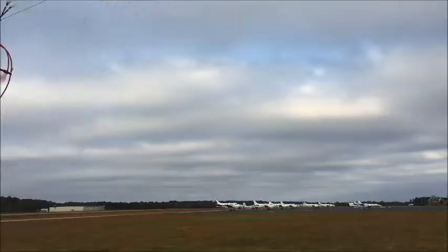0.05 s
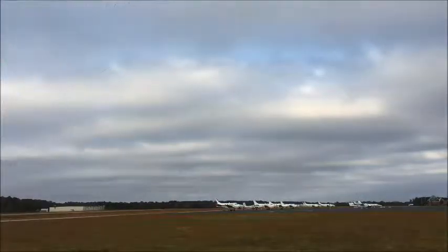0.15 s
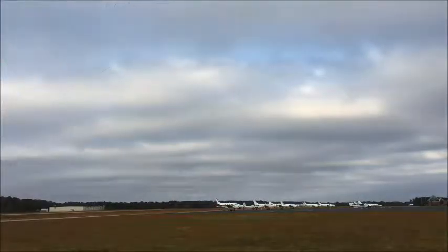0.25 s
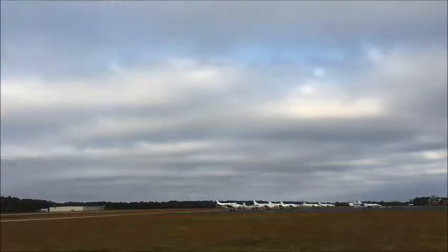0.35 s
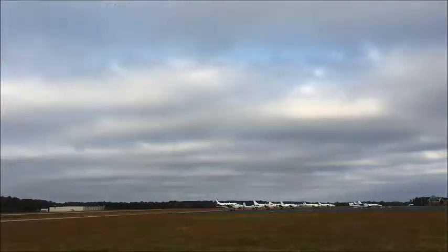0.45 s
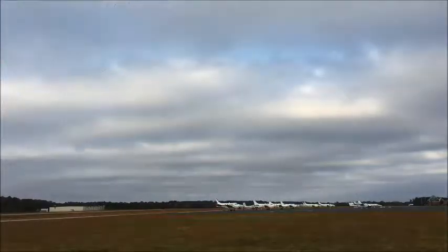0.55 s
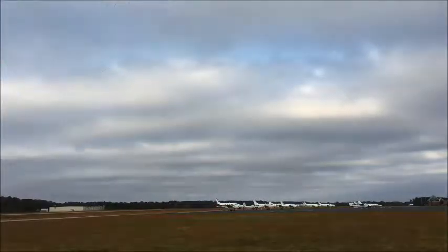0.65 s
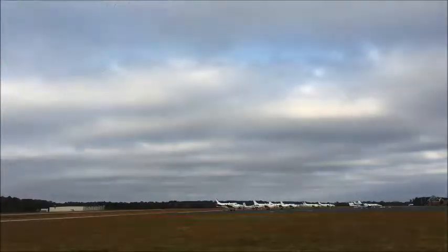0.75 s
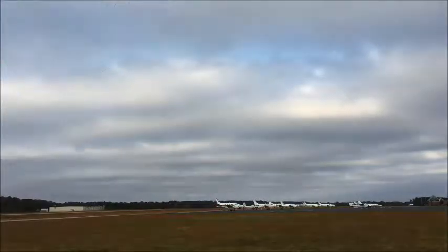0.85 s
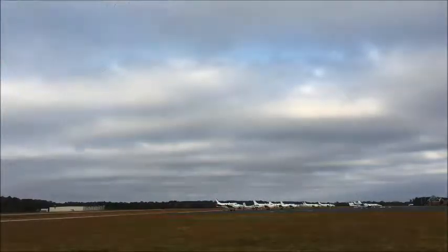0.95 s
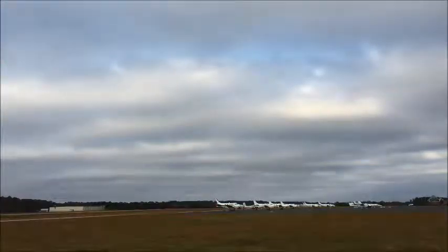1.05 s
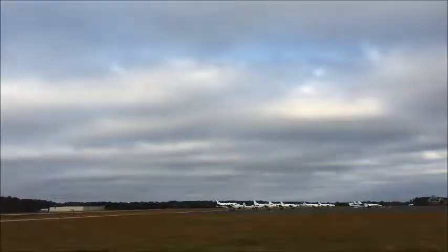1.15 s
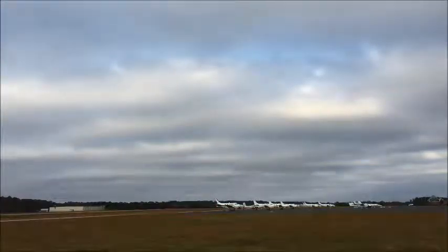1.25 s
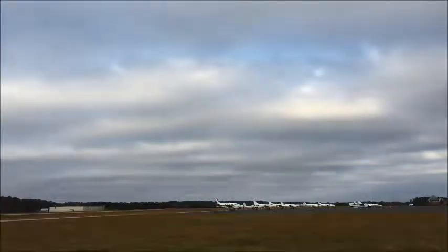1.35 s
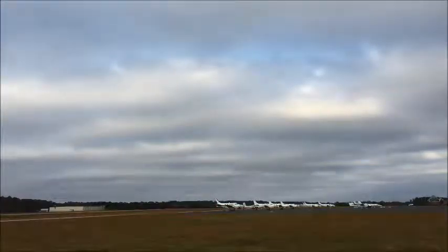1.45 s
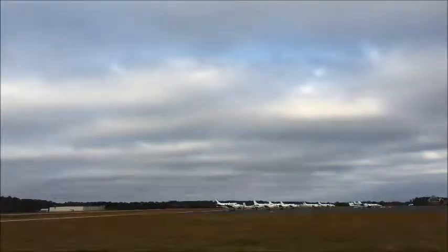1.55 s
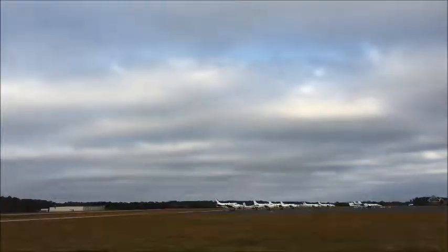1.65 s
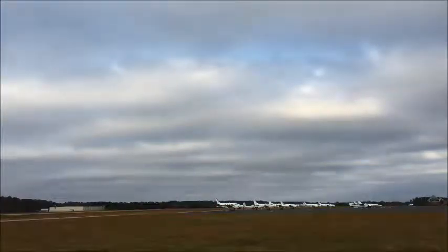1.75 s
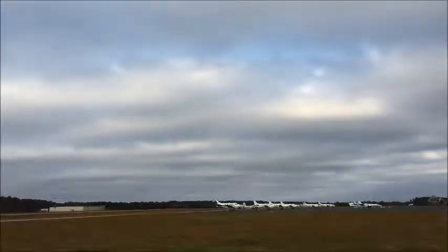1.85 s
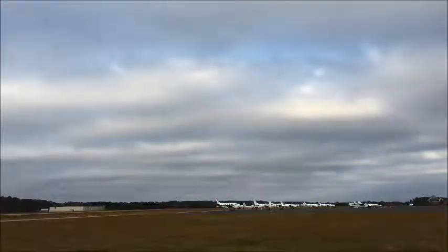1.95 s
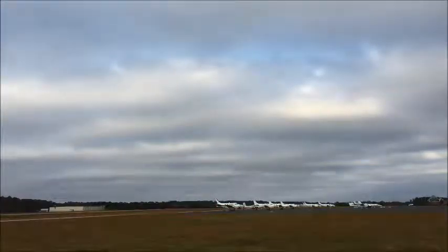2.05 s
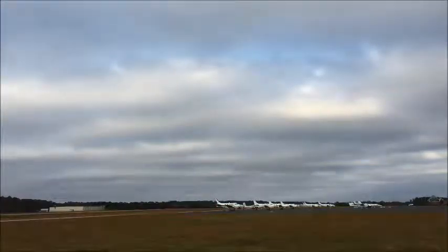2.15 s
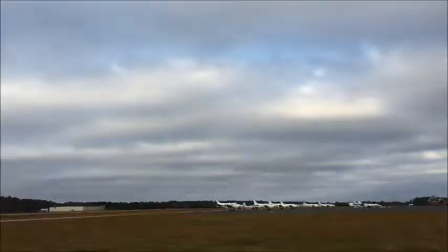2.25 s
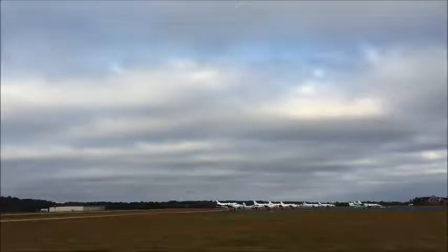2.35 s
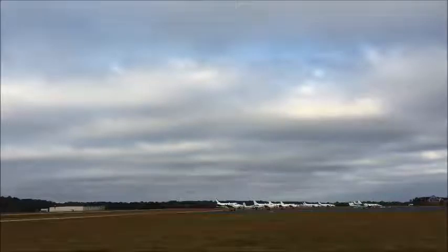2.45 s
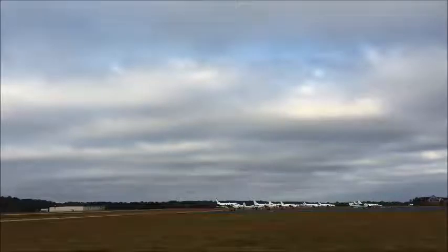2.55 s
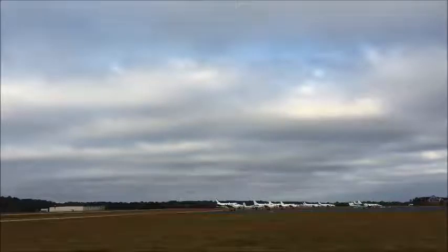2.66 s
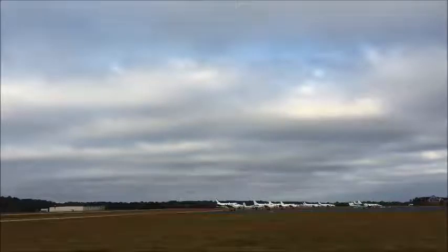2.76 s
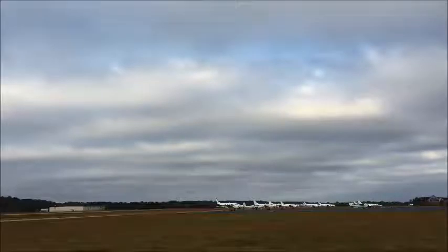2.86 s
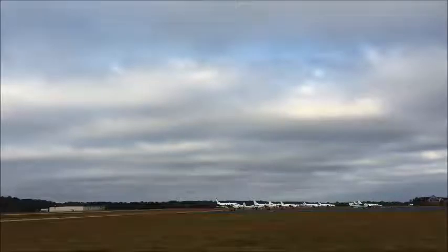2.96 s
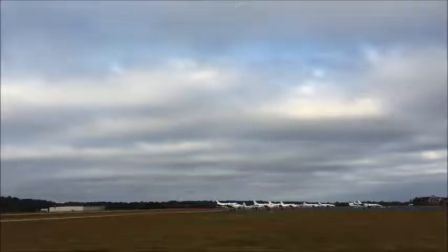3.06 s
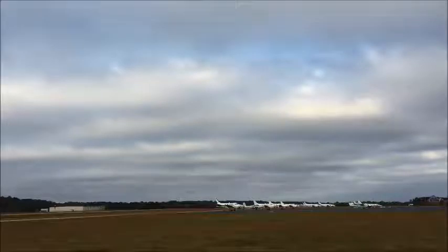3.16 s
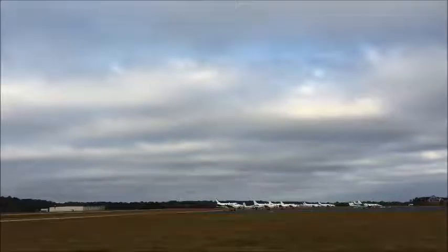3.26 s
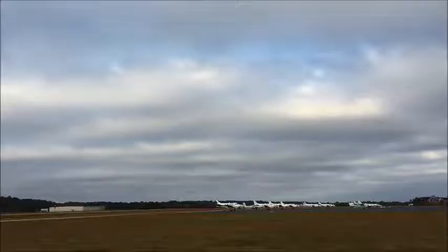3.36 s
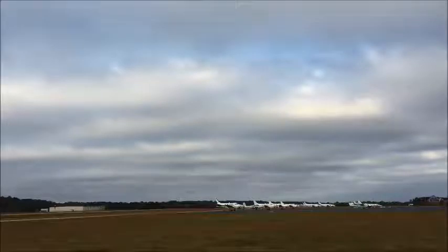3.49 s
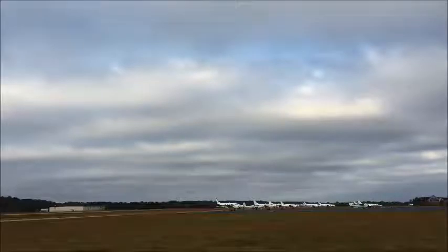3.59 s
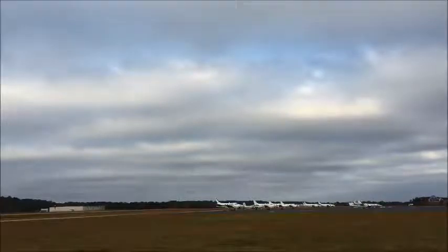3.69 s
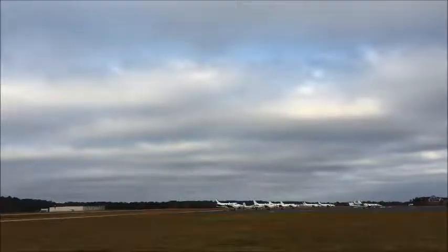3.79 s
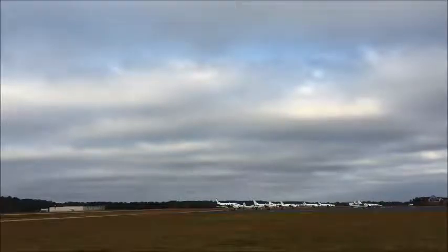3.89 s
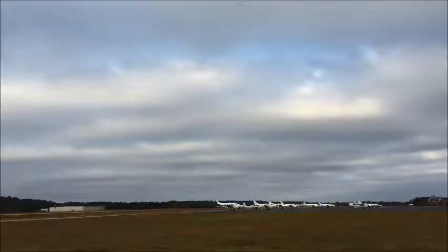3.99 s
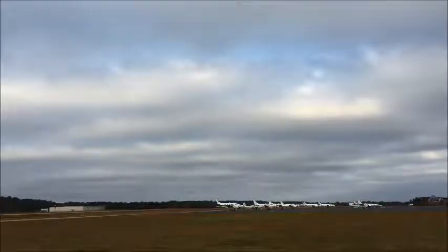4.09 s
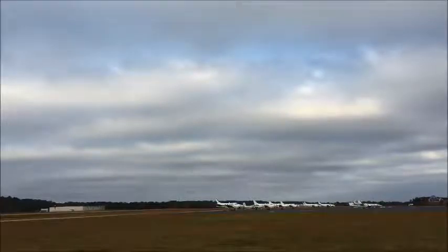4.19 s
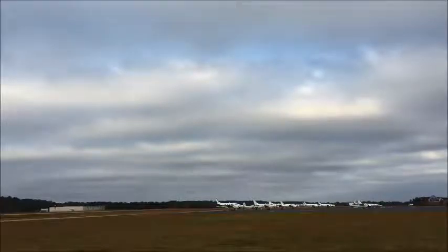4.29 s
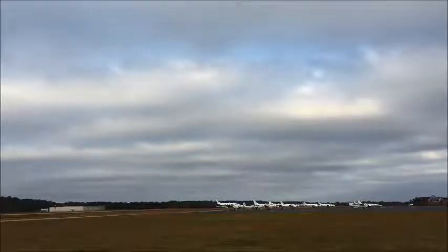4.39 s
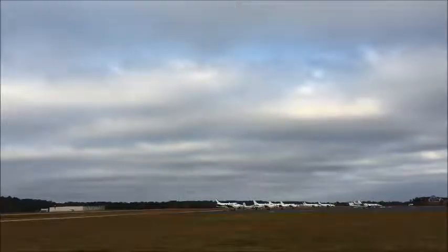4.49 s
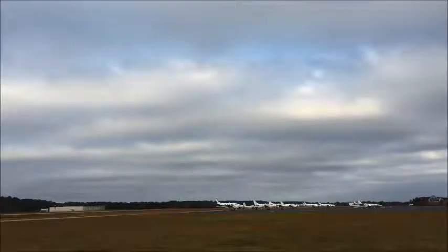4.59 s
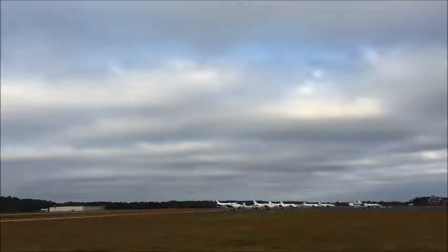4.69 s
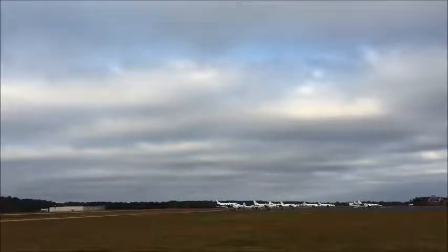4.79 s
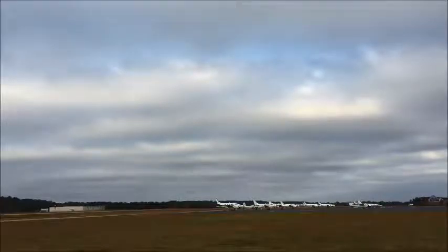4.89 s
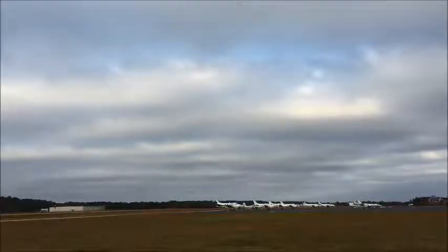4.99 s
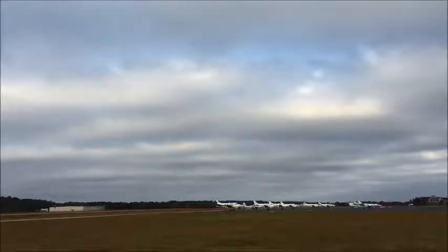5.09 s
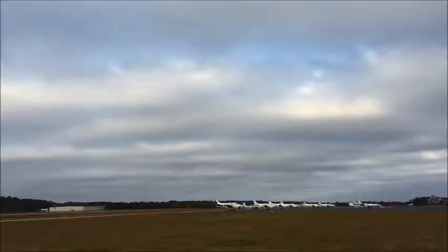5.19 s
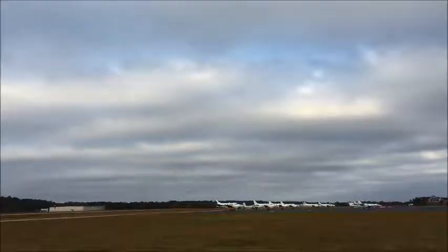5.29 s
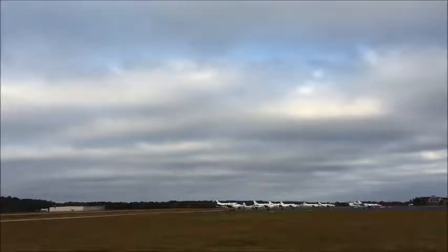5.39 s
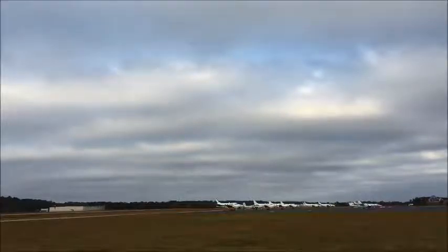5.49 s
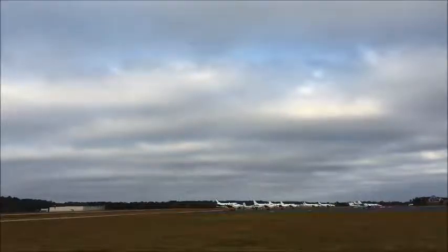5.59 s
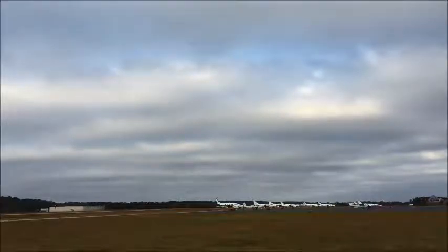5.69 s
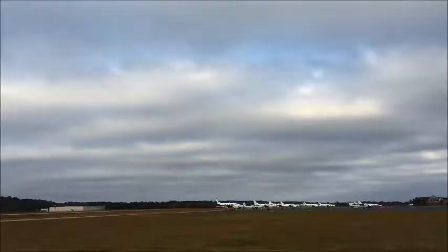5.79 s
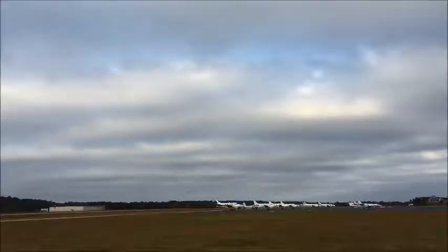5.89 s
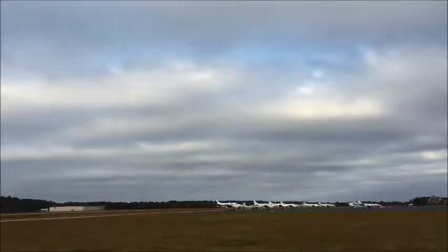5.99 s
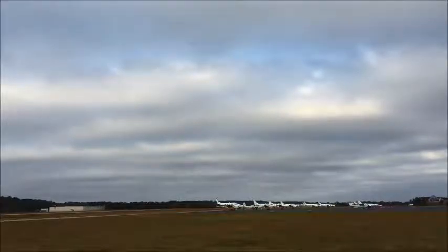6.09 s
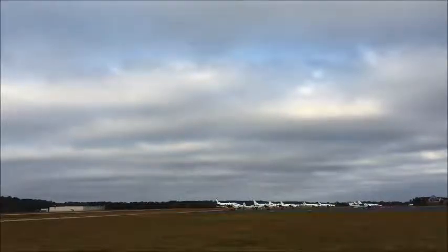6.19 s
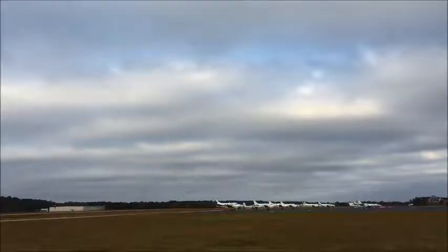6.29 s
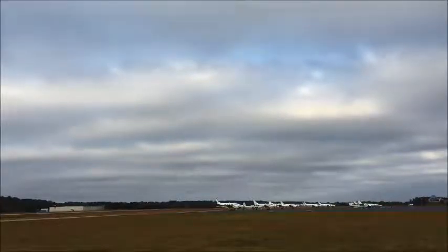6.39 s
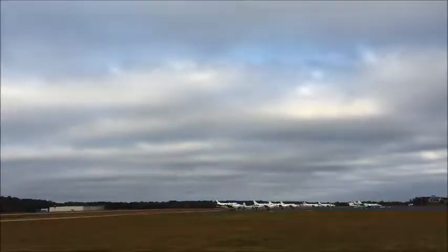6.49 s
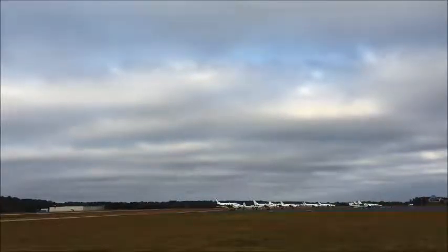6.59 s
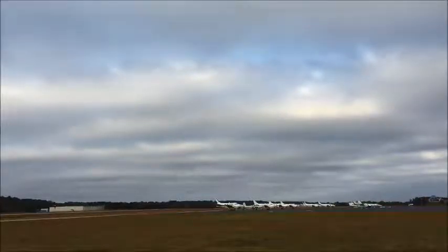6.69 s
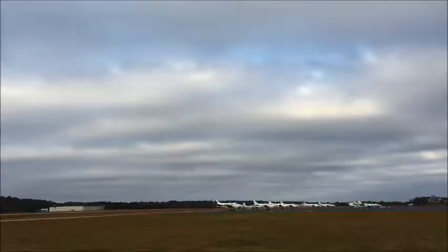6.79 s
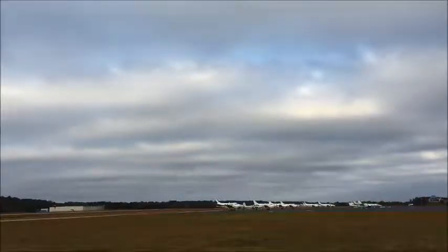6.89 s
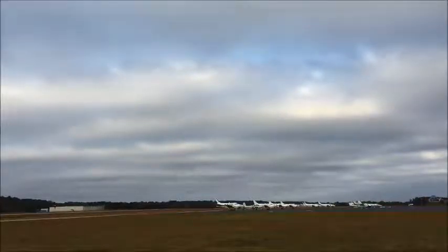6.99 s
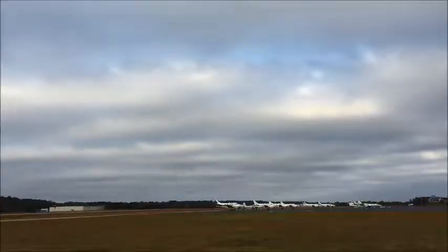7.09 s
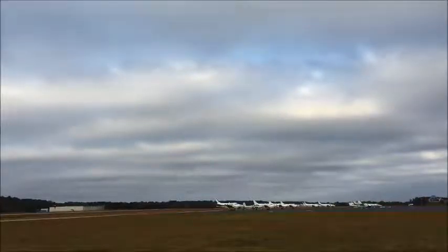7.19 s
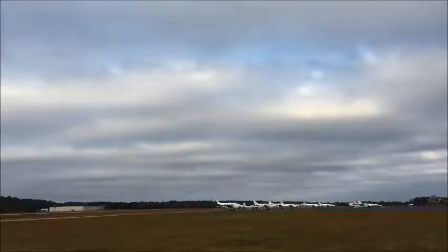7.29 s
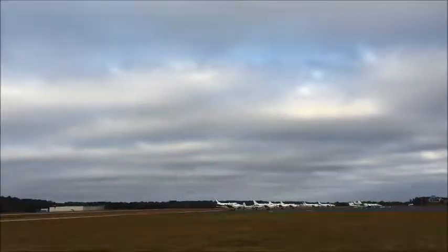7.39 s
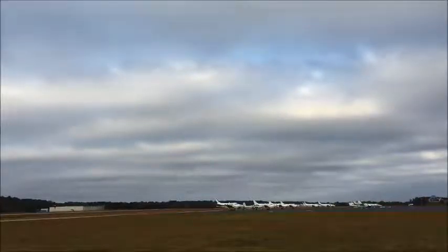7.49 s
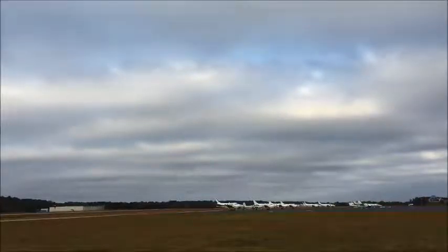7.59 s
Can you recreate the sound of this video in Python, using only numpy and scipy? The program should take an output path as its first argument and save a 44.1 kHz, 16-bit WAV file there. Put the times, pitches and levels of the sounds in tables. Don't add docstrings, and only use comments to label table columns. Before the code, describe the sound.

At 0 seconds a small two-cylinder aircraft is already near and loud: a hard, uneven thumping growl, about twenty-eight to thirty engine cycles a second with two unequal firings each, fused into a rough buzz. Raspy spits of exhaust ride over steady low tones, a geared propeller hum and a broad rushing wake. It is nearest at about 1.1 seconds, and the pitch slips down slightly between 0.5 and 1.5. From 2 seconds it recedes, gradually quieter and duller, the pitch almost constant. An echo off the grass adds a slowly sweeping hollow colour. Small metallic ticks occur near 3.8, 4.6 to 4.9 and 5.7 seconds. Soft low wind buffets touch the microphone around 3.6, 4.1 and 6.25. The rush wavers gently; by 7.6 the engine is distant but still audible. Open air, fixed microphone, no room reverberation.

```python
import sys
import numpy as np
from scipy import signal
from scipy.io import wavfile
from scipy.ndimage import uniform_filter1d, map_coordinates

SR = 44100
rng = np.random.default_rng(int(sys.argv[2]) if len(sys.argv) > 2 else 0)


def elevation(decibels):
    levels = np.asarray(decibels, float)
    return 10 ** (levels / 20)


def bounce(signal):
    frames = np.transpose(np.atleast_2d(signal))
    limited = np.clip(frames, -1, 1)
    pcm = np.round(limited * 32767).astype(np.int16)
    wavfile.write(sys.argv[1], SR, pcm)


N = 337365
T = np.arange(N) / SR

# time_s, engine_cycle_hz (as heard), ground_path_delay_ms
FLIGHT = [(0.0, 29.7, 1.9), (0.25, 29.58, 2.25), (0.5, 29.64, 2.85), (0.75, 29.26, 3.25),
          (1.0, 28.92, 3.65), (1.25, 28.54, 3.82), (1.5, 28.37, 3.8), (2.0, 28.27, 3.38), (2.5, 28.39, 3.0),
          (3.0, 28.26, 2.62), (3.5, 28.14, 2.3), (4.5, 27.955, 1.9), (5.0, 27.86, 1.74), (5.5, 27.9, 1.56),
          (6.0, 27.86, 1.44), (6.5, 28.06, 1.32), (7.0, 28.18, 1.25), (7.65, 28.05, 1.14)]
# engine_order (multiple of the cycle rate), level_db (within its group)
SILENCER_ORDERS = [(4, -6), (5, 5.5), (6, 2.5), (7, 11.5), (8, 0), (9, -11), (10, 2.5), (11, -7), (12, 4),
                   (13, -6), (14, -10), (15, -6), (16, -11), (17, -15), (22, -4)]
# overtone (multiple of the blade rate), level_db
BLADE_OVERTONES = [(3, 7), (4, -2), (5, -3), (6, -2), (7, -6), (8, -13), (9, -14)]
# pitch_hz, level_db (per third octave)
GAS_COLOUR = [(300, -11), (600, -9.5), (1200, -11), (2500, -1), (4400, 0.5), (7000, 4), (11000, 6.5),
              (15500, 4.5)]
# pitch_hz, level_db (per third octave)
WAKE_COLOUR = [(60, -16), (120, 2.5), (250, -2), (500, -5.5), (1000, 2), (1500, 1), (2300, 4.5),
               (3500, -6.5), (7000, -1), (15500, 1.5)]
# pitch_hz, level_db (per third octave)
WIND_COLOUR = [(25, -18), (40, -1), (80, 2.5), (120, 6), (200, -4), (400, -21)]
# peak_s, peak_db, half_length_s
GUSTS = [
    (3.6, -37, .2),
    (4.103, -32, 0.14),
    (4.45, -44, 0.1),
    (5.4, -41, .4),
    (6.25, -36, 0.18),
]
# peak_s, change_db, half_length_s
EDDIES = [
    (3.403, 2, 0.4),
    (4.2, 2, 0.41),
    (4.702, 1.5, 0.22),
    (5.4, -0.5, 0.099),
    (6.698, 0.5, 0.17),
    (7.2, 1, 0.07),
    (7.55, -5.5, .25),
]
# start_s, peak_db
TICKS = [
    (3.842, -20),
    (4.631, -23),
    (4.735, -27),
    (4.879, -21),
    (5.672, -27),
]
# pitch_hz, width_hz, depth (0-1)
HOUSING_DIPS = [
    (4900, 97, 0.7),
    (7550, 2440, 0.36),
    (10520, 1150, 0.52),
]
BEAMS = {"second order": (-21.5, -1.7, -0.6, -6), "third order": (-23, 3.4, 3, -6),
         "middle orders": (-25, -0.9, 5, -8), "higher orders": (-33, -3.5, -2.5, -7),
         "blade tone": (-21.5, 4.5, -14, -8.6), "blade octave": (-27.5, 2, -3.5, -12.5),
         "blade overtones": (-40, -2.1, 22, -10.5), "first pipe": (-20.5, -9, -13, -1.5),
         "second pipe": (-36.5, 6.5, 23, -15.5), "wake": (-19.5, -0.02, 4, -10),
         "crack": (-25.5, -2.7, 14.5, -17)}
FIRING = (.52, .92)

BLADES_PER_CYCLE, BLADE_START = 1.767, 0.6
SILENCER_LAG, BURST_RISE = 0.2, 0.022
NEAREST_S, NEAREST_M, SPEED_MS = 1.1, 11.0, 10.0
AIR_DB_PER_M = 0.19
SHIMMER_DB_PER_M = 0.02
STEEP_GAIN, STEEP_CUT_HZ = 0.8, 560
GRAZING_GAIN, GRAZING_CUT_HZ, GRAZING_M = 0.12, 2500, 50.0
CALM_WIND_DB = -46
TICK_HZ, TICK_S = 4400, 0.002


def curves(table):
    s, *columns = np.transpose(table)
    return [np.interp(T, s, column) for column in columns]


def band(x, lo_hz, hi_hz):
    sos = signal.butter(2, [lo_hz, min(hi_hz, 0.49 * SR)], "band", fs=SR, output="sos")
    return signal.sosfilt(sos, x)


def unit(x):
    return x / np.sqrt(np.mean(x ** 2))


def walk(rate_hz):
    step = int(SR / rate_hz)
    held = np.repeat(rng.standard_normal(N // step + 1), step)
    return 1.3 * uniform_filter1d(uniform_filter1d(held, step), step)[:N]


def bumps(table):
    return sum(db * np.exp(-((T - s) / half_s) ** 2) for s, db, half_s in table)


def coloured(points, envelope, wobble_db, metres):
    hz, db = np.transpose(points)
    out, power = 0, 0
    for f in 25.2 * 2 ** (np.arange(29) / 3):
        if not hz[0] <= f <= 1.1 * hz[-1]:
            continue
        gain = elevation(np.interp(np.log(f), np.log(hz), db))
        air_db = -AIR_DB_PER_M * metres * (f / 1e4) ** 2
        noise = unit(band(rng.standard_normal(N) * envelope, f / 1.12, f * 1.12))
        out = out + gain * elevation(air_db + wobble_db()) * noise
        power += gain ** 2
    return out / np.sqrt(power)


def wind():
    gusts = elevation(CALM_WIND_DB) + bumps([(s, elevation(db), half_s) for s, db, half_s in GUSTS])
    return gusts * coloured(WIND_COLOUR, elevation(walk(4.7)), lambda: 0.85 * walk(6), 0)


def ground(craft, lag_ms, metres):
    steep = signal.lfilter(*signal.butter(1, STEEP_CUT_HZ, fs=SR), craft)
    grazing = signal.lfilter(*signal.butter(1, GRAZING_CUT_HZ, fs=SR), craft)
    flat = np.clip((metres - NEAREST_M) / GRAZING_M, 0, 1)
    grass = steep + flat * (grazing - steep)
    lag_ms = lag_ms + (0.03 + 0.9 / metres) * walk(50)
    late = map_coordinates(grass, [np.arange(N) - lag_ms * SR / 1000], order=1, mode="nearest")
    return np.minimum(STEEP_GAIN + GRAZING_GAIN * flat, 0.95) * late


def beam(part, along_m, metres):
    abeam_db, lean_db, axis_db, fade_db = BEAMS[part]
    tail = along_m / metres
    return abeam_db + lean_db * tail + axis_db * tail ** 2 + fade_db * np.log2(metres / NEAREST_M)


def bracket():
    out = 0
    for s, db in TICKS:
        age = np.maximum(T - s, 0) / TICK_S
        envelope = np.e * age * np.exp(-age)
        out = out + elevation(db - 5.5) * envelope * np.sin(2 * np.pi * TICK_HZ * T)
    return out


def wake(cycle, db, metres):
    passes = np.exp(1.57 * np.cos(2 * np.pi * (BLADES_PER_CYCLE * cycle - 0.33)))
    throb = 1 + (0.08 + 0.00089 * metres) * passes
    grain = elevation(2.0 * walk(300))
    envelope = throb * grain / uniform_filter1d(throb, size=4000)
    return elevation(db) * coloured(WAKE_COLOUR, envelope, lambda: 0.69 * walk(9), metres)


def blades(cycle, tone_db, octave_db, over_db):
    turn = 2 * np.pi * (BLADES_PER_CYCLE * cycle + BLADE_START)
    overtones = 0
    for k, db in BLADE_OVERTONES:
        level = elevation(db + 0.2 * k * walk(5))
        overtones = overtones + level * np.cos(k * turn + 0.04 * k * walk(4))
    hum = elevation(tone_db) * np.cos(turn) + elevation(octave_db) * np.cos(2 * turn)
    return hum + elevation(np.minimum(over_db, -35)) * overtones


def silencer(cycle, second_db, third_db, middle_db, higher_db):
    levels = [(2, second_db), (3, third_db)]
    for k, db in SILENCER_ORDERS:
        tilt_db = 0.05 * (k - 10) * (higher_db - higher_db.max())
        group_db = middle_db if k < 7 else higher_db + tilt_db
        levels.append((k, db + group_db + 0.04 * k * walk(6)))
    out = 0
    for k, db in levels:
        k = round(k)
        pair = sum(np.exp(-2j * np.pi * k * (at + SILENCER_LAG)) for at in FIRING)
        out = out - elevation(db) * np.sin(2 * np.pi * k * cycle + np.angle(pair))
    return out


def tailpipes(cycle, first_db, second_db, crack_db, metres):
    gate, cracks, count = 0, 0, int(cycle[-1]) + 2
    scatter_db = 0.7 + SHIMMER_DB_PER_M * metres
    for at, db in zip(FIRING, (first_db, second_db)):
        chance = np.clip(rng.standard_normal((count, 3)), -1.4, 1.4)
        k = np.floor(cycle - at).astype(int) + 1
        age = np.clip(cycle - at + 1 - k - 0.0053 * (2 + chance[k, 0]), 0, 1)
        rise = 1 - np.exp(-age / (BURST_RISE + 0.00037 * metres))
        burst = np.exp(-age / 0.13 - (age / 0.27) ** 4)
        puff = rise * (burst + 0.21 * (1 - age))
        gate = gate + elevation(db + scatter_db * chance[k, 1]) * puff
        cracks = cracks + elevation(0.33 * chance[k, 2]) * np.diff(k, prepend=k[0])
    firing = sum(np.floor(cycle - at).astype(int) + 1 for at in FIRING)
    smooth = elevation(first_db) + elevation(second_db)

    def colour():
        chance = np.clip(rng.standard_normal(2 * count), -1.4, 1.4)
        return (1.2 + scatter_db) * uniform_filter1d(chance[firing], 40)

    gas = smooth * coloured(GAS_COLOUR, gate / smooth, colour, metres)
    ring_level = smooth * elevation(-19.5 + 0.022 * metres + 1.1 * colour())
    ring = ring_level * unit(band(rng.standard_normal(N) * gate / smooth, 4190, 4350))
    swell = elevation(0.012 * metres * walk(5))
    return swell * (gas + ring) + elevation(crack_db - 2.5) * unit(band(cracks, 324, 1150))


def scene():
    cycle_hz, lag_ms = curves(FLIGHT)
    cycle = np.cumsum(cycle_hz) / SR
    along_m = SPEED_MS * (T - NEAREST_S)
    metres = np.hypot(NEAREST_M, along_m)
    *tones_db, first_db, second_db, wake_db, crack_db = (beam(part, along_m, metres) for part in BEAMS)
    tones = elevation(0.5) * (silencer(cycle, *tones_db[:4]) + blades(cycle, *tones_db[4:]))
    rush = tailpipes(cycle, first_db, second_db, crack_db, metres) + wake(cycle, wake_db, metres)
    craft = tones + elevation(bumps(EDDIES)) * rush + bracket()
    return (craft + ground(craft, lag_ms, metres) + wind())[None]


def roll_off(x):
    return signal.sosfilt(signal.butter(12, 17020, fs=SR, output="sos"), x)


def record(dry):
    x = signal.sosfilt(signal.butter(2, 38, "high", fs=SR, output="sos"), dry)
    for hz, width_hz, depth in HOUSING_DIPS:
        x = x - depth * signal.lfilter(*signal.iirpeak(hz, hz / width_hz, fs=SR), x)
    x = 0.95 * np.tanh(x / 0.95)
    x = signal.sosfilt(signal.ellip(14, 0.3, 80, 15850, fs=SR, output="sos"), x)
    return roll_off(x)


dry = scene()
out = record(dry)
bounce(out)
```